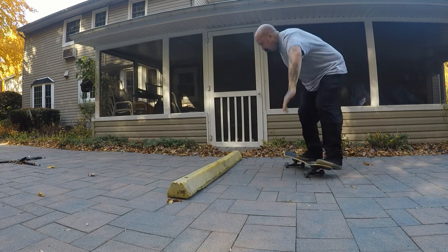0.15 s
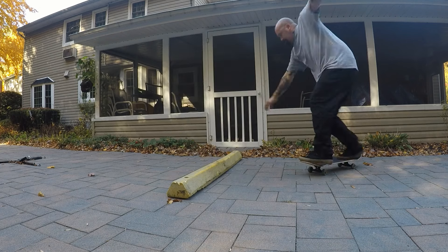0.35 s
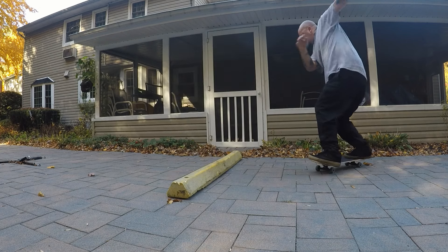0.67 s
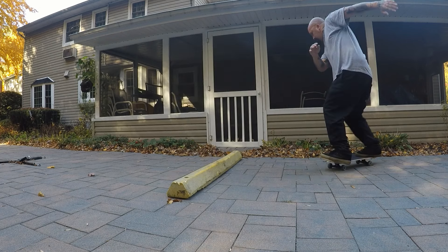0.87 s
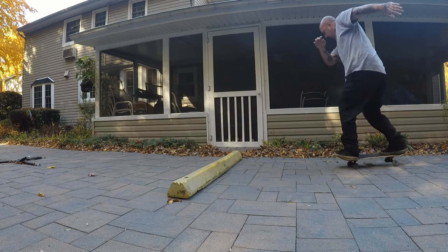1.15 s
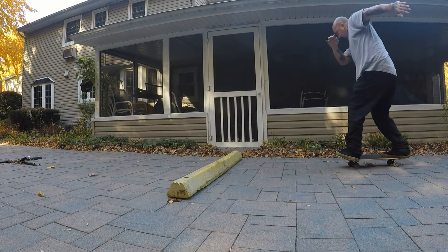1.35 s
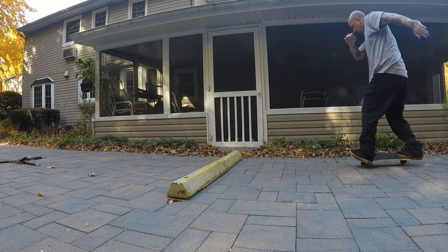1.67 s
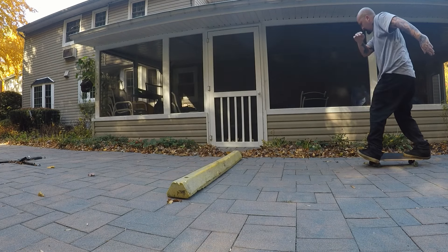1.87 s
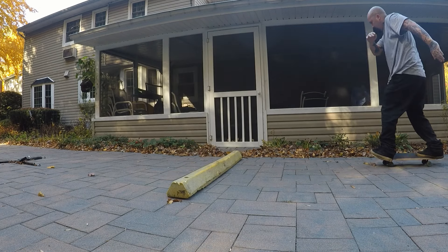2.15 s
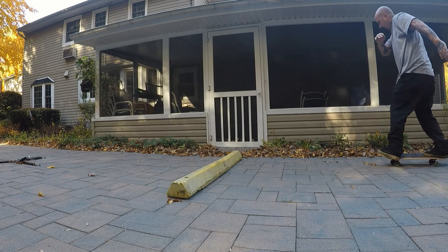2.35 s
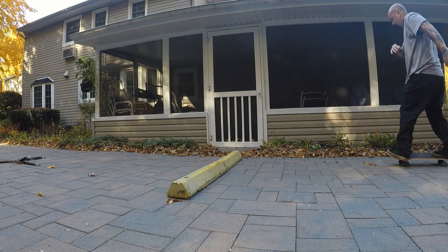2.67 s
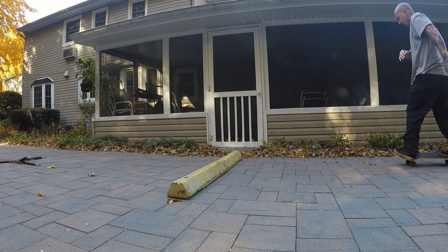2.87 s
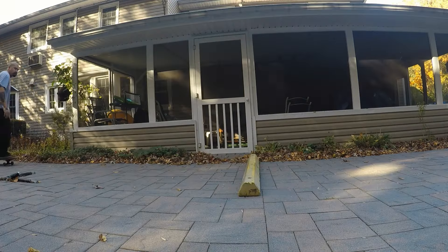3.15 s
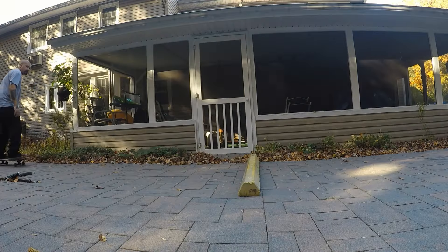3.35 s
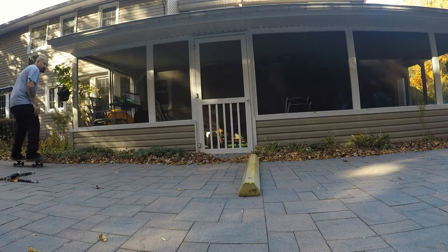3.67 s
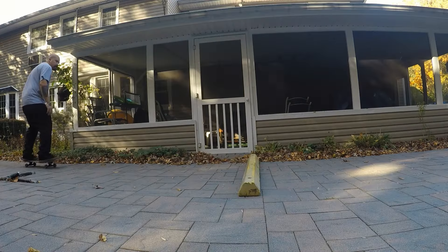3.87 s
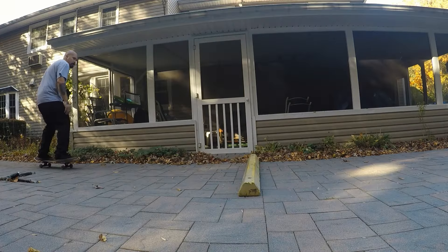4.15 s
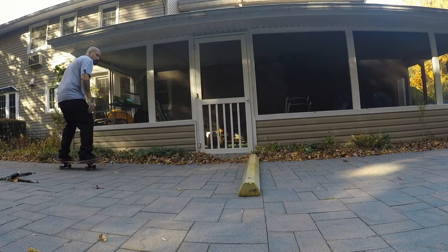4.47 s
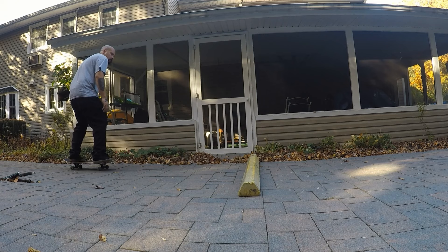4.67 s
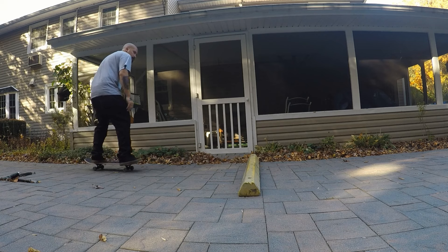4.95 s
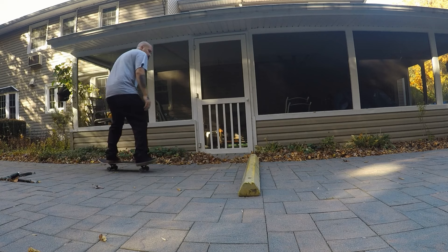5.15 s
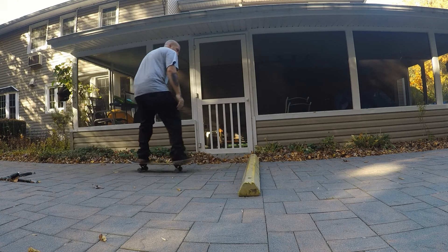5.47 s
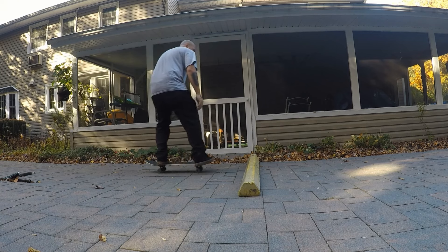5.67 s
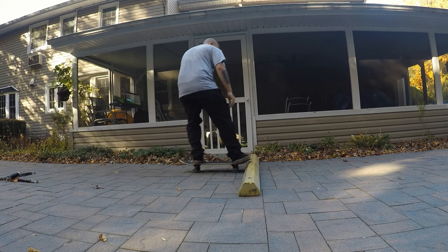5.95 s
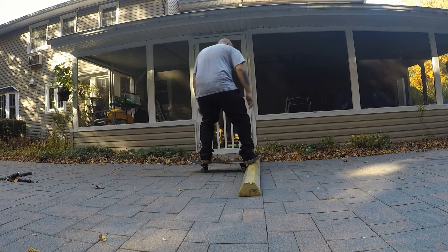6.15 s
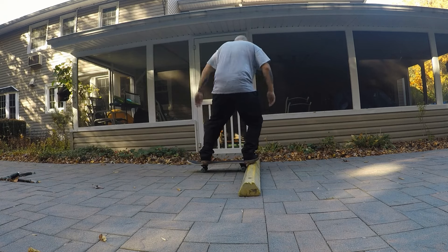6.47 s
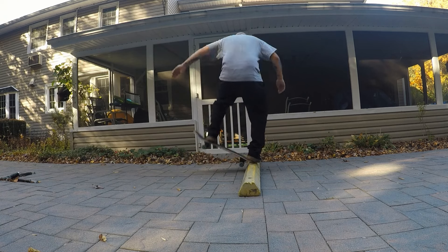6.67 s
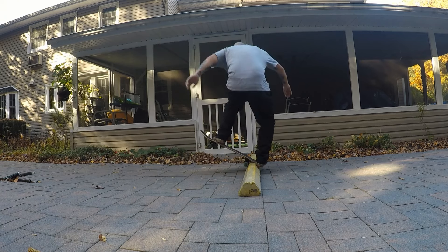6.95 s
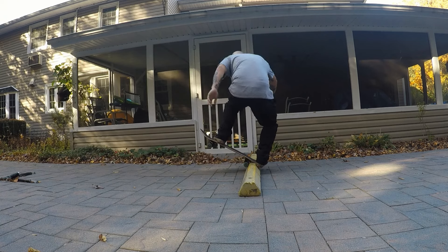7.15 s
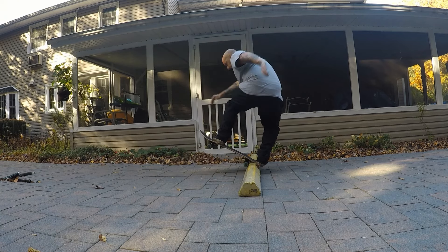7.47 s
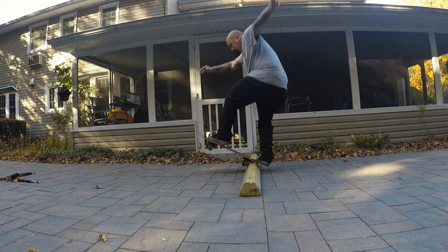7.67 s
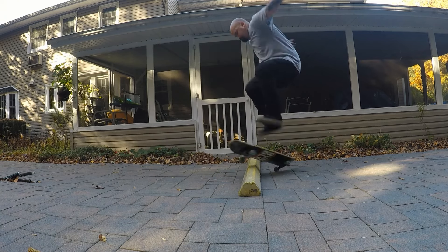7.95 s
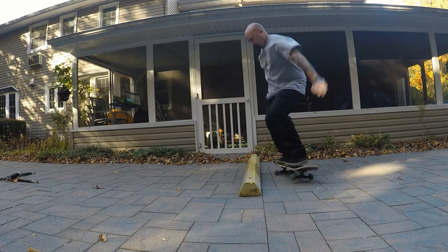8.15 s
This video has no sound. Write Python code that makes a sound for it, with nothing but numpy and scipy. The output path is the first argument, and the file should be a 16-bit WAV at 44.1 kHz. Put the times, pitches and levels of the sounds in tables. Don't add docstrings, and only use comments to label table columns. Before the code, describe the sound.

Outdoors on a patio, heard from a boxed microphone on the ground: woody deck cracks and low booms first, then sparse wheel clunks and shoe scuffs. After a sudden change, steady clacking wheels rumble in over a low motor hum, hit a curb with a short grind, go nearly quiet, knock again, then pop off and land sharply. Faint traffic, leaves and hiss remain.

```python
import sys
import numpy as np
from scipy import signal
from scipy.fft import rfft, irfft, next_fast_len
from scipy.io import wavfile
from scipy.ndimage import uniform_filter1d

SR = 44100
rng = np.random.default_rng(int(sys.argv[2]) if len(sys.argv) > 2 else 0)


def unload_audio(sound):
    columns = np.transpose(np.atleast_2d(sound))
    steps = np.round(np.clip(columns, -1, 1) * 32767)
    wavfile.write(sys.argv[1], SR, steps.astype(np.int16))


def invert_db(level):
    return 10 ** (np.asarray(level, dtype=float) / 20)


N = 366030

# start_s, peak_db, ring_hz, late_boom_db and truck_knock_db (both re peak)
TRICKS = [(0, -14, 250, -21, -16), (0.0145, -6.5, 258.6, -15.5, -12), (0.085, -15, 250, -0.5, -20),
          (0.118, -6.5, 263, -36.5, -13), (0.163, -12.5, 236, -28, -28), (0.380, -4.5, 227, -7, -17),
          (0.437, -2, 220, -26.5, -13.5), (0.498, -10, 181.4, -9.5, -27), (1.286, -3, 235, -20, -10),
          (1.291, -5, 230, -8.5, -14), (6.11, -10, 458, 4, -22.5), (6.146, -6.5, 258.4, -27.5, -12.5),
          (6.182, -6, 253.4, -17.5, -28), (6.865, -4, 242.4, -1, -8), (6.898, -5.5, 309, -24, -12),
          (6.938, -8, 263, -23, -15), (6.96, -5, 282, -9, -29), (7.777, -17, 177, 2, -8.5),
          (7.799, -14.5, 330, -15, -7), (7.839, -10, 250, 0, -15), (7.854, -4, 306, -25.5, -31.5),
          (7.912, -2.5, 202, -10.5, -19), (7.9335, 0.5, 297, -28, -20), (8.0295, -1, 291.6, -19, -23),
          (8.062, -9, 283, -24.5, -25.5), (8.1375, -0.5, 256, -20, -13), (8.155, -1, 296.5, -22, -21.5)]
# start_s, peak_db, ring_hz, late_boom_db (re peak)
JOINTS_AWAY = [(0.845, -25.5, 239, 6), (0.889, -11, 235, 0.5), (0.971, -13.5, 214, -17),
               (1.033, -17, 274, 1), (1.108, -7, 252, -2), (1.365, -14.5, 187, -3), (1.534, -30.5, 290, 7),
               (1.676, -13, 261, -1.5), (1.773, -13, 268, -1), (2.01, -15, 170, 9), (2.063, -11, 195, -3.5),
               (2.287, -22.5, 306, 3), (2.415, -22.5, 273, -12), (2.661, -13.5, 207, -3.5),
               (2.732, -26, 189, -27), (2.808, -21.5, 166, -9), (2.967, -18.5, 181, -18)]
# start_s, peak_db, ring_hz, late_boom_db (re peak)
JOINTS_IN = [(3.111, -20, 219, 11), (3.174, -7.5, 164, -1), (3.299, -7, 193, 0.5), (3.363, -14, 215, -6),
             (3.425, -14.5, 245, 7), (3.553, -8.5, 250, 2.5), (3.617, -9, 234, -0.5),
             (3.733, -3, 276.5, -0.5), (3.817, -7.5, 292, -10), (3.883, -8.5, 279, -6),
             (3.988, -7, 275.4, 1.5), (4.057, -9, 227.4, 2.5), (4.154, -6, 161, -12),
             (4.348, -7.5, 243, -1.5), (4.473, -13, 263, -0.5), (4.532, -7, 208, -2),
             (4.681, -15, 266, 8.5), (4.764, -9.5, 250, -10), (4.889, -3, 260, 1.5), (4.95, -4.5, 222, -24),
             (5.038, -12, 184.5, 8), (5.183, -18, 259, 1), (5.257, -5, 224, -1), (5.426, -9.5, 183, -1.5),
             (5.524, -20.5, 201, -0.5), (5.626, -7, 183, -1.5), (5.733, -4.5, 228.5, 0.5),
             (5.777, -10.5, 196, -0.5), (5.924, -8.5, 296, 5), (5.998, -7, 208, 1)]
# start_s, peak_db
FOLLOWERS = [(1.145, -19), (1.394, -22.5), (1.7, -19), (1.805, -18.5), (2.043, -19), (3.207, -8.5),
             (3.329, -15.5), (3.387, -7), (3.77, -26.5), (3.852, -18), (4.023, -21), (4.18, -7),
             (4.212, -28), (4.382, -7.5), (4.56, -7), (4.922, -12), (5.068, -10), (5.279, -7.5),
             (5.312, -12), (5.455, -7.5), (5.806, -9), (6.047, -9.5), (6.216, -16), (7.073, -21),
             (7.988, -14), (8.166, -11.5), (8.283, -12)]
# freq_hz, level_db
GROUND_BOOM = [(15, -40), (30, -22), (50, -11), (75, -2), (100, 0), (140, 0), (200, -7), (300, -25),
               (600, -90)]
# freq_hz, level_db
DECK_RUMBLE = [(60, -29), (120, -23), (200, -2.5), (300, 1.5), (400, -10.5), (550, -21.5), (750, -30),
               (1100, -33.5), (2000, -66), (5000, -99.5)]
# freq_hz, level_db
TRUCK_RATTLE = [(300, -41.5), (400, -6), (465, 8), (560, -9.5), (850, -14), (1300, -24), (1900, -52)]
# start_s, head_db, body_db (re head)
THUMPS = [(3.178, -32.5, 13.5), (3.208, -28, 5.5), (3.297, -29, 8), (3.326, -26, 12), (3.365, -18, 11),
          (3.453, -28.5, 8), (3.532, -22, -3), (3.552, -18.5, -1), (3.616, -25, 16.5), (3.702, -28, 15.5),
          (3.788, -33.5, 11.5), (3.883, -22.5, 0.5), (3.985, -29, 23.5), (4.063, -36, 13), (4.154, -35, 5),
          (4.347, -20.5, 8), (4.47, -28, 19.5), (4.533, -28.5, 11), (4.56, -23.5, 1.5), (4.68, -43, 10.5),
          (4.759, -36, -1), (4.862, -25.5, 11.5), (4.886, -25.5, 8.5), (4.948, -21, -16), (4.995, -23, 13),
          (5.137, -44, -4), (5.176, -26.5, 8), (5.258, -25, -1), (5.278, -19.5, 13), (5.367, -21, 5.5),
          (5.426, -40, -2), (5.44, -26, 18), (5.525, -21.5, 1), (5.591, -33.5, 8), (5.608, -26.5, 7),
          (5.626, -14.5, 6), (5.654, -21, 8), (5.735, -20.5, 16), (5.922, -31, 16.5), (5.973, -23.5, 16.5),
          (5.997, -28.5, 13), (6.038, -19.5, 7), (6.108, -21, 16.5), (6.11, -25, 11)]
# start_s, level_db, brightness_db_per_octave
WHACKS = [(.118, -24.5, 2), (0.436, -17, 1), (1.29, -18, 6.5), (6.11, -19.5, 0), (6.142, -27, -2.5),
          (6.864, -18.5, 0.5), (6.948, -25, -1), (7.845, -25, 4.5), (7.91, -17, 5), (7.93, -17.5, 5.5),
          (8.029, -24, 3), (8.139, -15, 3.5), (8.154, -30.5, -7.5)]
# freq_hz, level_db, t60_s
WOOD_MODES = [(330, 10.5, 0.051), (453, -4, 0.14), (518, -2.5, 0.11), (699, -9, 0.084), (737, -12.5, 0.16),
              (920, -21, 0.13), (1170, -12.5, 0.095), (1347, -13, .06), (1783, -20, 0.069),
              (1893, -25, 0.062), (2270, -26, 0.047), (2500, -41.5, 0.081), (2760, -29, 0.045)]
# start_s, peak_db, strongest_hz, length_s
CRACKS = [(0.015, -24.5, 1400, .006), (0.1134, -26, 1420, .005), (0.433, -20.5, 1190, 0.0088),
          (1.29, -21, 1300, 0.0047), (3.33, -36, 1180, 0.0037), (5.261, -38.5, 1340, 0.0045),
          (5.437, -43.5, 3630, .005), (6.112, -28.5, 1740, 0.0056), (6.144, -28.5, 1380, .005),
          (6.86, -24, 1350, 0.012), (7.66, -46, 1560, 0.0045), (7.843, -26.5, 3890, 0.021),
          (7.9096, -23, 1360, 0.0079), (7.9295, -13, 3605, 0.0038), (8.027, -22.5, 1350, 0.0033),
          (8.1352, -26, 1310, 0.0036), (8.1528, -28.5, 2500, 0.0054)]
# freq_hz, level_db
CASE = [(900, -52.5), (2200, -9), (3200, -1.5), (3660, 2.5), (4200, -1), (5000, -5), (6200, -1.5),
        (8000, -8.5), (15000, -35)]
# freq_hz, level_db
DECK_RASP = [(300, -46), (600, -5.5), (1000, 2.5), (1400, 0), (1900, -6.5), (2600, -9.5), (4000, -17),
             (9000, -60.5)]
# time_s, ground_rumble_db, deck_rumble_db
ROLL = [(0.0, -41, -17.5), (0.16, -37.5, -44), (3.17, -36.5, -39.5), (3.33, -20.5, -27), (4.7, -19, -31.5),
        (6.08, -19.5, -24.5), (6.33, -34, -42.5), (7.49, -32.5, -47), (8.3, -24.5, -31)]
# peak_s, peak_db, rise_s, fall_s
SCUFFS = [(0, -42.5, .01, 0.0041), (.11, -44.5, 0.067, 0.048), (.27, -56, 0.03, .04),
          (.33, -49.5, 0.021, 0.053), (.44, -39, 0.0028, 0.087), (.61, -53, 0.023, 0.031),
          (.75, -47, 0.098, 0.017), (.98, -56.5, 0.34, 0.33), (1.13, -52.5, 0.13, 0.043),
          (1.29, -49.5, 0.017, 0.12), (1.42, -42.5, 0.068, 0.045), (1.57, -47.5, 0.039, 0.093),
          (1.74, -39.5, 0.09, 0.076), (2.39, -57, 0.53, 0.049), (2.96, -53.5, 0.014, 0.031),
          (3.57, -59, 0.019, 0.06), (3.73, -65, 0.024, 0.032), (3.96, -51.5, 0.042, 0.094),
          (4.19, -52, 0.056, 0.068), (4.63, -56.5, 0.24, 0.14), (4.92, -57.5, 0.26, 0.73),
          (5.26, -48, 0.0076, 0.044), (5.52, -44.5, 0.078, 0.094), (5.79, -38.5, 0.047, 0.044),
          (5.99, -50.5, 0.24, 0.017), (6.1, -45, 0.091, 0.096), (6.42, -54, 0.12, 0.056),
          (6.6, -53.5, 0.019, 0.034), (6.87, -44, 0.021, 0.12), (7.85, -47.5, 0.03, 0.037),
          (8.15, -53, 0.0078, 0.024), (8.3, -42, 0.015, .03)]
# peak_s, peak_db, rise_s, fall_s
DRAGS = [(0.02, -46, .02, 0.068), (.44, -38, 0.0067, 0.1), (1.0, -53.5, 0.1, 0.35), (1.3, -43, 0.014, 0.15),
         (1.71, -52, 0.11, 0.23), (4.91, -60.5, .6, 0.15), (5.45, -56.5, 0.18, 1),
         (6.13, -45.5, 0.035, 0.15), (6.88, -36.5, 0.027, 0.13), (7.95, -46, 0.22, 0.12),
         (8.16, -35, 0.032, 0.0086)]
# time_s, hiss_db
SAND = [(0, -54), (.17, -74.5), (.8, -70.5), (2.6, -57), (2.9, -60.5), (3.15, -55.5), (6.1, -71),
        (6.3, -81), (6.95, -67), (7.2, -68), (7.64, -84), (7.68, -53), (8.09, -54), (8.22, -60.5),
        (8.3, -82)]
# start_s, peak_db, ring_hz
TICKS = [(0.013, -29, 6800), (0.3883, -35, 2500), (1.2724, -32.5, 3660), (1.376, -33, 3870),
         (2.091, -38, 5900), (2.947, -35.5, 6100), (2.9576, -35, 3000), (3.5587, -31.5, 3640),
         (3.7159, -33.5, 3640), (4.1848, -35, 2950), (4.3844, -33.5, 3720), (4.538, -33, 4580),
         (4.616, -36, 4670), (4.912, -33, 3470), (5.052, -31.5, 3950), (5.577, -29, 3750),
         (5.679, -36, 2500), (5.8345, -35, 4500), (5.9415, -33, 4270), (5.9824, -30, 3760),
         (6.056, -28, 4170), (6.586, -36.5, 4030), (7.779, -28.5, 5500), (7.798, -35, 3900),
         (8.162, -27, 3950), (8.277, -31.5, 5940)]
# start_s, length_s, level_db, jerks_per_s
SCRAPES = [(0.676, 0.11, -54, 140), (2.313, .11, -54.5, 150), (1.261, .03, -48, 200),
           (1.357, .1, -45.5, 100), (1.674, .09, -47.5, 100), (4.148, .11, -53.5, 70),
           (5.433, .17, -45, 91), (5.733, .125, -42.5, 85), (5.915, .085, -53.5, 42),
           (6.048, .055, -44.5, 62), (7.661, .1, -56, 41), (7.783, .1, -48.5, 93)]
# freq_hz, level_db
GRIP_TAPE = [(1500, -22), (2600, -9.5), (3200, -8), (3700, 7), (4300, -4.5), (5000, -3.5), (6500, -11),
             (13000, -32.5)]
# start_s, level_db, pitch_hz, length_s
SQUEAKS = [
    (0.088, -42, 3200, 0.019),
    (0.092, -37, 4400, 0.018),
    (0.316, -41, 3550, 0.027),
    (0.592, -44.5, 3250, 0.045),
    (1.725, -34, 3125, 0.027),
    (6.401, -44.5, 3900, 0.041),
    (8.185, -51.5, 7500, 0.032),
]
# start_s, level_db, pitch_hz, length_s
SINGS = [
    (0.06, -32, 1450, 0.0091),
    (0.125, -43, 1370, 0.056),
    (3.288, -47, 897, 0.035),
    (3.35, -41, 920, 0.069),
    (4.365, -40.5, 900, 0.046),
    (6.106, -25, 458, 0.07),
    (6.114, -45, 1750, 0.065),
    (6.945, -54, 2500, 0.024),
]
# time_s, level_db
MOTOR_LEVEL = [(3.1, -60), (3.15, -24), (5.2, -24), (6.3, -28), (6.8, -28), (7.1, -25), (7.8, -25),
               (8.0, -30), (8.3, -33)]
# freq_hz, level_db
MOTOR_LINES = [(64.6, -8), (137.6, 0), (247.6, -18), (275.2, -23), (412.8, -34), (550.4, -39)]
# freq_hz, level_db
TRAFFIC = [(24, -72.5), (40, -15), (76, -8), (113, 4.5), (167, 5), (333, 4.5), (646, -39.5), (800, -17.5),
           (1040, -33.5), (1760, -120)]
# freq_hz, level_db
LEAVES = [(200, -35.5), (400, 1.5), (600, -1.5), (1000, -0.5), (1500, -10.5), (2200, -19), (5000, -37.5)]
# time_s, level_db
WIND = [(0, -57), (.6, -39), (1.5, -28.5), (2.2, -34.5), (3.05, -45.5), (3.15, -37.5), (5.5, -33.5),
        (7.3, -27), (7.7, -31.5)]
# freq_hz, level_db
GUST = [(10, -12), (30, 0), (60, -8), (110, -30), (300, -90)]
# freq_hz, left_lead_rad
PORT_PHASE = [(300, -.1), (460, -.4), (620, -1.5), (780, -2.9), (1050, -3.3), (1400, -5.2), (1900, -6.2),
              (3800, -6.3), (4600, -6.8), (8000, -7.4)]
# freq_hz, left_minus_right_db
PORT_DB = [(60, -0.5), (300, -0.5), (700, 5.5), (1400, 1), (2800, -1.5), (5500, -1.5), (10000, 0.5),
           (14000, -21.5)]
# freq_hz, level_db
SCATTER = [(40, -27), (150, -15), (350, -20.5), (620, -27.5), (850, -11), (1150, -12.5), (1800, 3),
           (2500, -4.5), (3600, -13.5), (5000, -5.5), (11000, 2)]
# freq_hz, level_db
HISS = [(900, -7.5), (2000, 5.5), (4500, -1.5), (8000, 2), (10000, 0.5), (14000, -8.5)]
# freq_hz, level_db
TOP = [(11000, 0), (14000, -6), (15500, -30)]

CHANGE_S = 3.1428


def on_hz(table, size):
    hz, value = np.transpose(table)
    return np.interp(np.log(np.fft.rfftfreq(size, 1 / SR) + 1), np.log(hz + 1), value)


def colour(x, table):
    size = 2 ** 12
    ceps = irfft(on_hz(table, size) * np.log(10) / 20)
    ceps[1:size // 2] *= 2
    ceps[size // 2 + 1:] = 0
    impulse = irfft(np.exp(rfft(ceps)))[None, :size // 2]
    return signal.oaconvolve(x, impulse, axes=1)[:, :N]


def unit(x):
    return x / np.sqrt(np.mean(x ** 2))


def noise(table):
    return unit(colour(rng.standard_normal((2, N)), table))


def curves(table):
    s, *columns = np.transpose(table)
    return [np.interp(np.arange(N) / SR, s, c) for c in columns]


def walk(rate):
    hold = int(SR / rate)
    steps = np.repeat(rng.standard_normal(N // hold + 1), hold)
    return 1.3 * uniform_filter1d(uniform_filter1d(steps, hold), hold)[:N]


def grit(rate, spread_db, smooth):
    size = invert_db(spread_db * np.minimum(rng.exponential(size=N), 2))
    hits = (rng.random(N) < rate / SR) * size * np.sign(rng.standard_normal((2, N)))
    return unit(hits) + smooth * rng.standard_normal((2, N))


def add(out, s, sound):
    i = max(int(s * SR), 0)
    out[i:i + len(sound)] += sound[:N - i]


def decay(t, t60):
    return np.exp(-np.log(1000) * t / t60)


def swells(table):
    out, t = np.zeros(N), np.arange(-SR, SR) / SR
    for s, db, rise, fall in table:
        away = np.maximum(-t / max(rise, 1e-3), t / max(fall, 1e-3))
        shape = invert_db(db - 15 * away)
        add(out, s - 1, shape[max(SR - int(s * SR), 0):])
    return out


def blows():
    out, rattle, boom, knock = np.zeros((4, N))
    t = np.arange(SR // 4) / SR
    rise = 1 - decay(t, 0.028)
    struck_shape = -decay(t, 0.095) * (1 - decay(t, 0.012))
    rolled_shape = decay(t, 0.086) * rise
    rolled_glide = 0.72 * 0.0053 * (1 - np.exp(-t / 0.0048))
    follower_hz = 250 + 30.3 * rng.uniform(-0.59, 1, len(FOLLOWERS))
    rows = TRICKS + [r + (-45,) for r in JOINTS_AWAY] + [r + (-21.5,) for r in JOINTS_IN]
    rows = rows + [r + (hz, -14.5, -25) for r, hz in zip(FOLLOWERS, follower_hz)]
    chance = rng.random((len(rows), 3))
    for k, ((s, db, hz, boom_db, knock_db), (side, turn, sign)) in enumerate(zip(rows, chance)):
        struck = k < len(TRICKS)
        glide = 0 if struck else rolled_glide
        pair_level = 0.25 if struck else 0.5
        shape = struck_shape if struck else np.sign(sign - .5) * rolled_shape
        pair = np.sin(2 * np.pi * (hz * (0.793 + 0.422 * side) * t + turn))
        ring = np.sin(2 * np.pi * hz * (t + glide)) + pair_level * pair
        add(out, s, invert_db(db) * ring * shape)
        add(knock, s, invert_db(db + knock_db - 1.0) * decay(t, 0.053) * (1 - decay(t, 0.0022)))
        add(rattle, s, invert_db(db - 3.5 * struck) * decay(t, 0.17) * rise)
        add(boom, s, invert_db(db + boom_db) * decay(t, 0.42) * (1 - decay(t, 0.1)))
    late = np.roll(out, SR // 150)
    rattling = knock * noise(TRUCK_RATTLE) + invert_db(-10.0) * rattle * noise(DECK_RUMBLE)
    return np.array([out, late]) + rattling + invert_db(-4.5) * boom * noise(GROUND_BOOM)


def thumps():
    out, t = np.zeros(N), np.arange(SR // 8) / SR
    start_hz, end_hz, glide_s, axle_hz = 806, 133.3, 0.00802, 945
    turns = end_hz * t + (start_hz - end_hz) * glide_s * (1 - np.exp(-t / glide_s))
    head = decay(t, 0.016) * (1 - decay(t, 0.008))
    body = decay(t, 0.12) * (1 - decay(t, 0.048)) ** 2
    for (s, db, body_db), (size, turn) in zip(THUMPS, rng.random((len(THUMPS), 2))):
        chirp = np.sin(2 * np.pi * (turns * (.88 + 0.248 * size) + turn))
        add(out, s, invert_db(db - 1.5) * (head + invert_db(body_db) * body) * chirp)
        axle = np.sin(2 * np.pi * axle_hz * (.9 + 0.18 * turn) * t) * decay(t, .09) * (1 - decay(t, .004))
        add(out, s, invert_db(db - 15 - 6 * size) * axle)
    return out * np.array([[1], [.6]])


def whacks():
    out, t = np.zeros(N), np.arange(SR // 4) / SR
    hz, mode_db, t60 = np.transpose(WOOD_MODES)[:, :, None]
    chance = rng.standard_normal((len(WHACKS), 2, len(WOOD_MODES), 1))
    for (s, db, tilt_db), (pull, size) in zip(WHACKS, chance):
        level = invert_db(db + mode_db + tilt_db * np.log2(hz / 700) + 2.0 * size)
        modes = level * decay(t, t60) * np.sin(2 * np.pi * hz * (1 + 0.022 * pull) * t)
        add(out, s, modes.sum(axis=0) * (1 - decay(t, 0.0031)))
    return out * np.array([[1], [.6]])


def cracks():
    ring, burst, tail = np.zeros((3, N))
    t = np.arange(SR // 5) / SR
    rise = 1 - decay(t, 0.0035)
    ring_shape = np.exp(-.5 * (t / 0.0013 - 2) ** 2)
    for s, db, hz, length in CRACKS:
        add(burst, s, invert_db(db) * rise * np.exp(-(t / length) ** 3))
        add(tail, s, invert_db(db) * rise * decay(t, 0.094))
        add(ring, s, invert_db(1.34 * db) * np.sin(2 * np.pi * hz * t) * ring_shape)
    bright, dull = noise(CASE), noise(DECK_RASP)
    direct = burst * (invert_db(-9.5) * bright + invert_db(-8.5) * dull)
    return invert_db(7.0) * ring + direct + tail * (invert_db(-23.5) * bright + invert_db(-17.5) * dull)


def rolling():
    ground_db, deck_db = curves(ROLL)
    bumps = grit(rate=120., spread_db=4.0, smooth=.5)
    ground = invert_db(ground_db + 1.5 * walk(14)) * unit(colour(bumps, GROUND_BOOM))
    return ground + invert_db(deck_db) * unit(colour(bumps, DECK_RUMBLE))


def scuffing():
    patch = 2 * walk(60)
    sand = grit(rate=1500., spread_db=4.0, smooth=1.0)
    case = unit(colour(sand, CASE))
    ring = signal.sosfilt(signal.butter(2, 4600, fs=SR, output="sos"), case)
    hiss = ring * invert_db(1.6 * walk(25)) + (case - ring) * invert_db(1.6 * walk(25))
    bed = invert_db(curves(SAND)[0])
    rasp = (swells(DRAGS) + invert_db(-1.5) * bed) * invert_db(1.2 * patch) * unit(colour(sand, DECK_RASP))
    return (swells(SCUFFS) + bed) * invert_db(patch) * hiss + rasp


def ticks():
    ring, snap, jerks = np.zeros((3, N))
    t = np.arange(SR // 40) / SR
    for s, db, hz in TICKS:
        add(snap, s, invert_db(db - 13.5) * np.exp(-(t / 0.0069) ** 2) * (1 - decay(t, 0.0069)))
        add(ring, s, invert_db(db - 8.0) * np.sin(2 * np.pi * hz * t) * decay(t, .02) * (1 - decay(t, 0.0027)))
    jerk = np.exp(-((t - .004) / 0.0048) ** 2)
    chance = rng.standard_normal((len(SCRAPES), 2, 2 ** 5))
    for (s, length, db, rate), (gap, size) in zip(SCRAPES, chance):
        at = np.cumsum(np.exp(.3 * gap)) / rate - 1 / rate
        for a, d in zip(at[at < length], size):
            add(jerks, s + max(a, 0), invert_db(db + 1.8 * d) * jerk)
    return ring * np.array([[1], [.5]]) + snap * noise(CASE) + jerks * noise(GRIP_TAPE)


def squeaks():
    out = np.zeros(N)
    waver = 1 + .045 * walk(400)
    for s, db, hz, length in SQUEAKS + SINGS:
        size = int(length * SR)
        turns = 2 * np.pi * hz * np.cumsum(waver[int(s * SR):][:size]) / SR
        tone = np.sin(turns) + invert_db(-16) * np.sin(2 * turns)
        add(out, s, invert_db(db) * np.hanning(size) ** .5 * tone)
    return out * np.array([[1], [.5]])


def motor():
    turns = np.cumsum(1 + .004 * walk(6)) / SR
    lines = sum(invert_db(db + 1.5 * walk(15)) * np.sin(2 * np.pi * hz * turns) for hz, db in MOTOR_LINES)
    return np.sqrt(2) * invert_db(curves(MOTOR_LEVEL)[0]) * lines * np.array([[1], [0]])


def outdoors():
    traffic_db = -44 + walk(2) - 5 * (np.arange(N) > CHANGE_S * SR)
    far = invert_db(traffic_db) * noise(TRAFFIC) + invert_db(-53) * noise(LEAVES)
    return far + invert_db(curves(WIND)[0] + 1.5 * walk(6)) * noise(GUST)


def scene():
    board = blows() + thumps() + whacks() + cracks() + rolling()
    contact = scuffing() + ticks() + squeaks()
    shared, apart = board + contact + motor() + outdoors()
    ports = shared + colour(apart[None], SCATTER) * np.array([[1], [-1]])
    size = next_fast_len(N + SR)
    left = invert_db(on_hz(PORT_DB, size) / 2) * np.exp(.5j * on_hz(PORT_PHASE, size))
    return irfft(rfft(ports, size) * np.array([left, 1 / left]), size)[:, :N]


def low_pass(x):
    return signal.sosfilt(signal.butter(12, 15410, fs=SR, output="sos"), x)


def record(dry):
    step = np.zeros(N)
    add(step, CHANGE_S, invert_db(-9) * decay(np.arange(SR // 30) / SR, 0.018))
    keep = np.exp(-1 / (0.12 * SR))
    treble = signal.lfilter([1 - keep], [1, -keep], np.abs(np.diff(dry[0], prepend=0)))
    duck = 1 / (1 + (treble / invert_db(-40)) ** 2)
    hissing = dry + duck * invert_db(-58 + 1.2 * walk(7.0)) * noise(HISS)
    soft = hissing / (1 + hissing ** 6) ** (1 / 6)
    mix = colour(soft, TOP) + step
    return low_pass(mix)


dry = scene()
out = record(dry)
unload_audio(out)
```